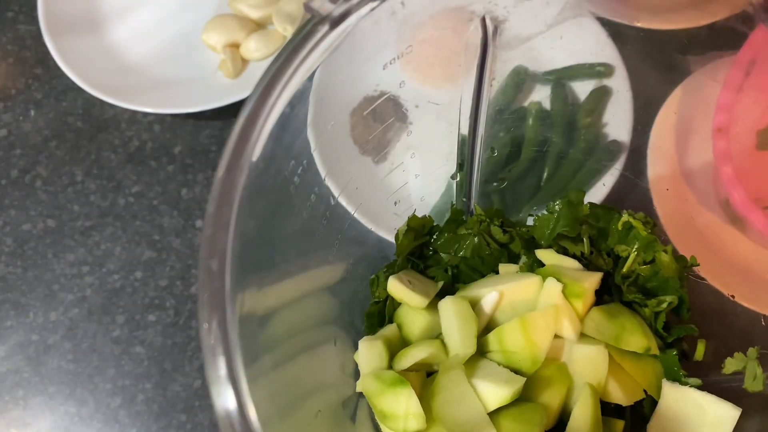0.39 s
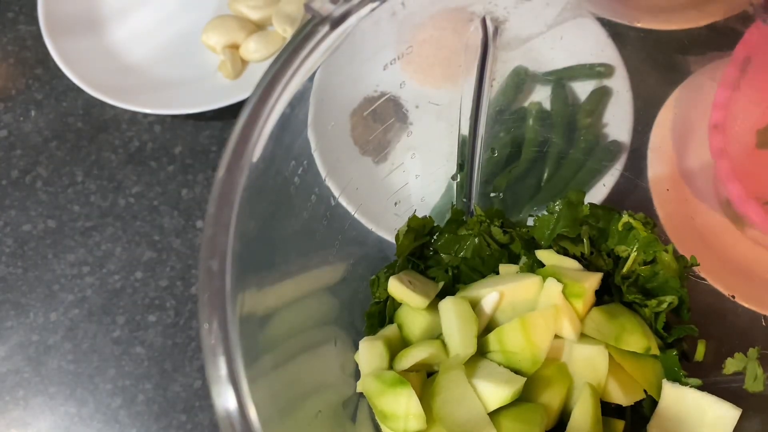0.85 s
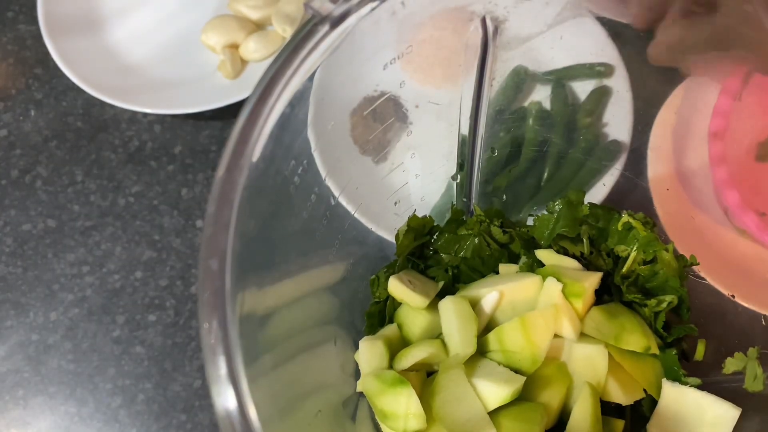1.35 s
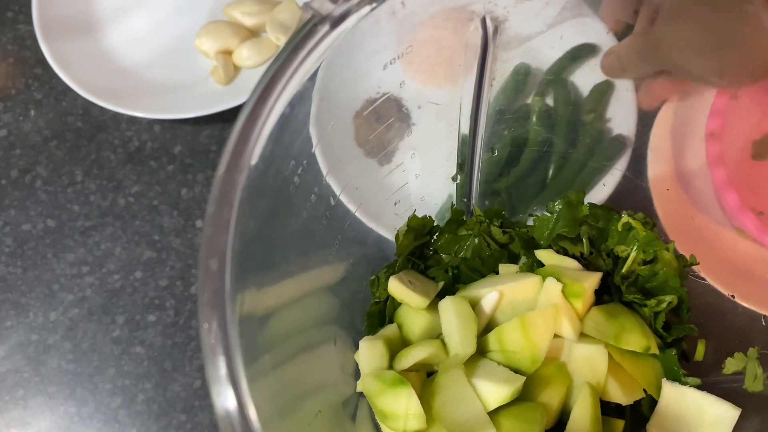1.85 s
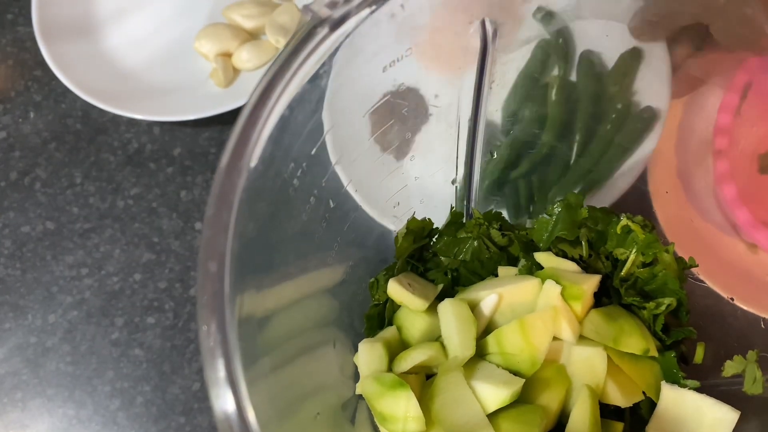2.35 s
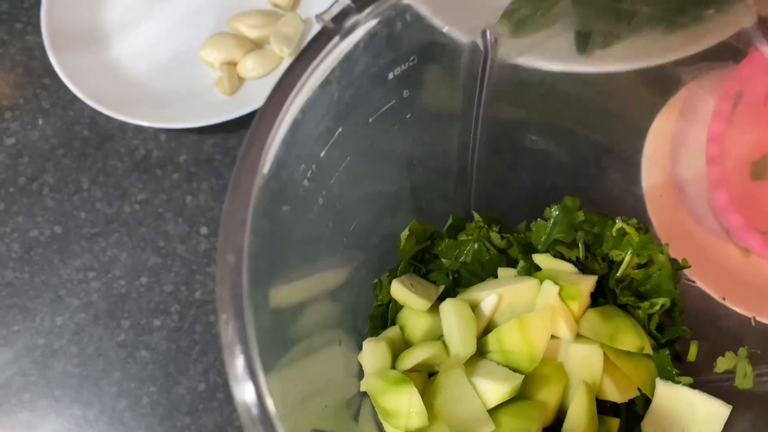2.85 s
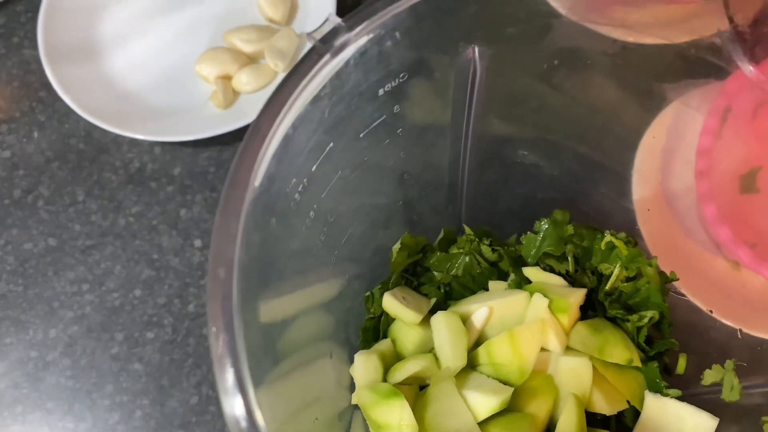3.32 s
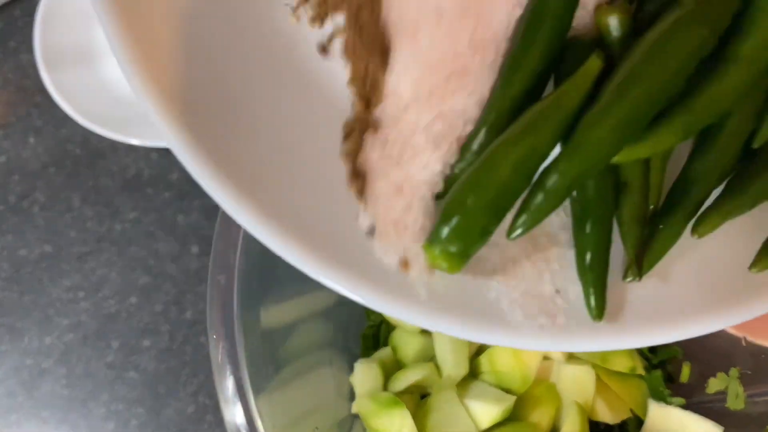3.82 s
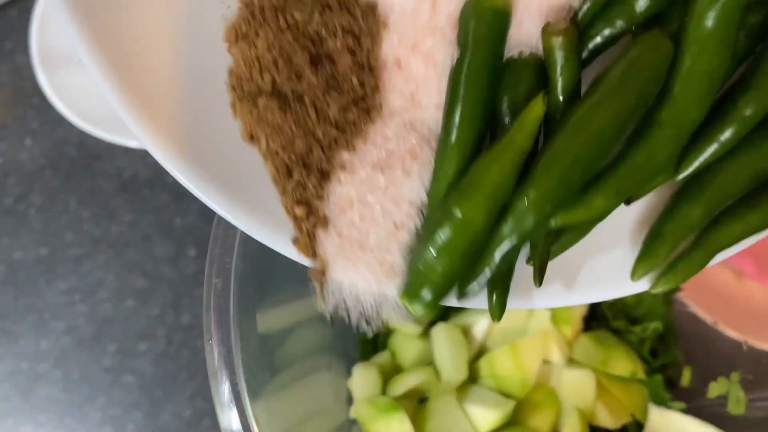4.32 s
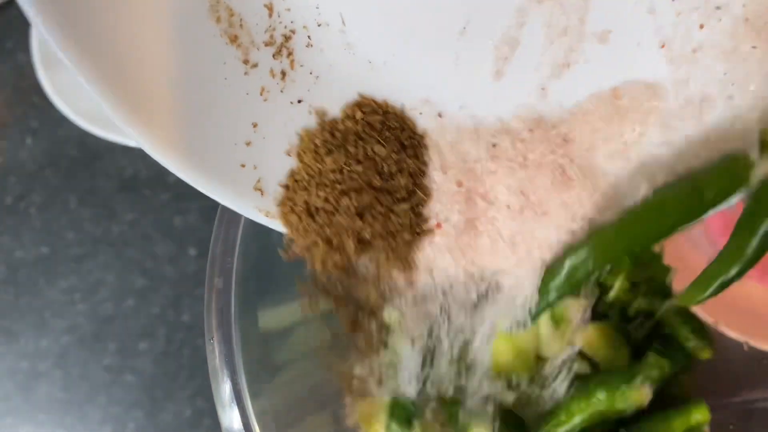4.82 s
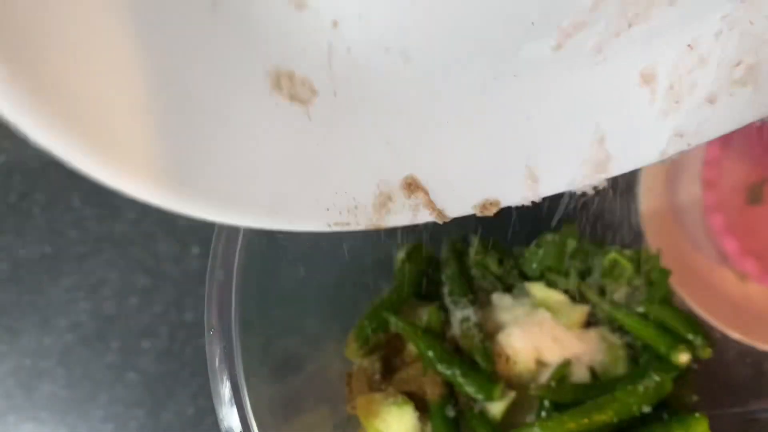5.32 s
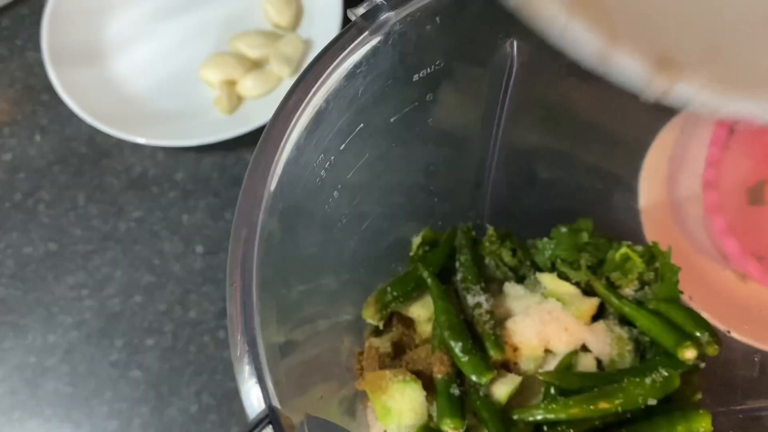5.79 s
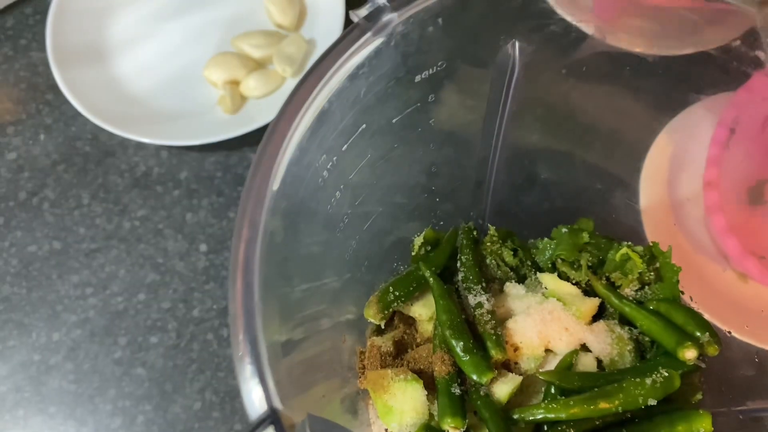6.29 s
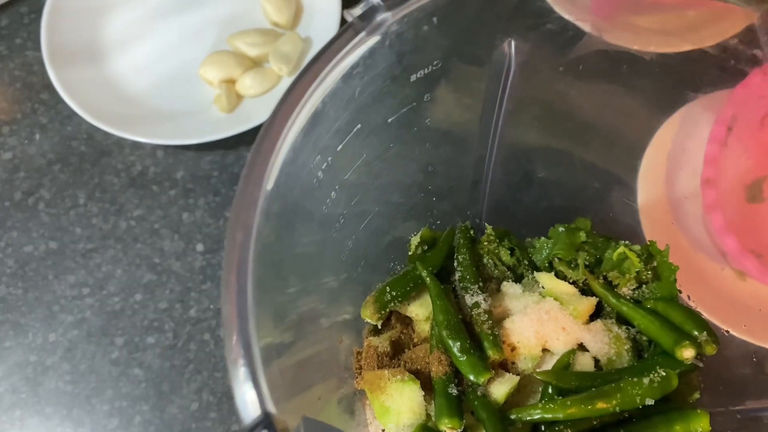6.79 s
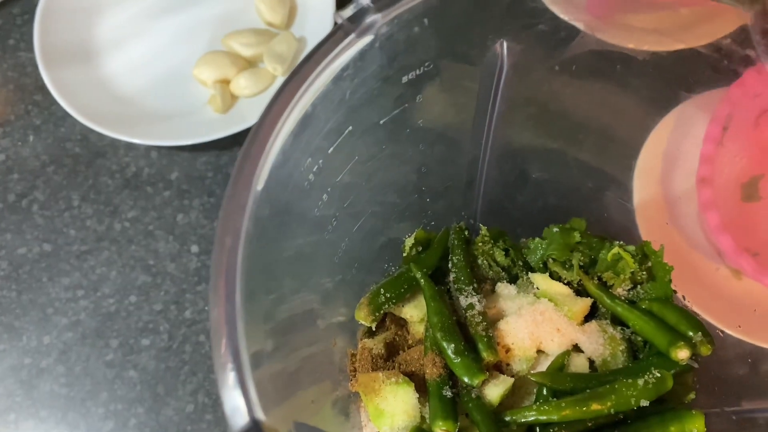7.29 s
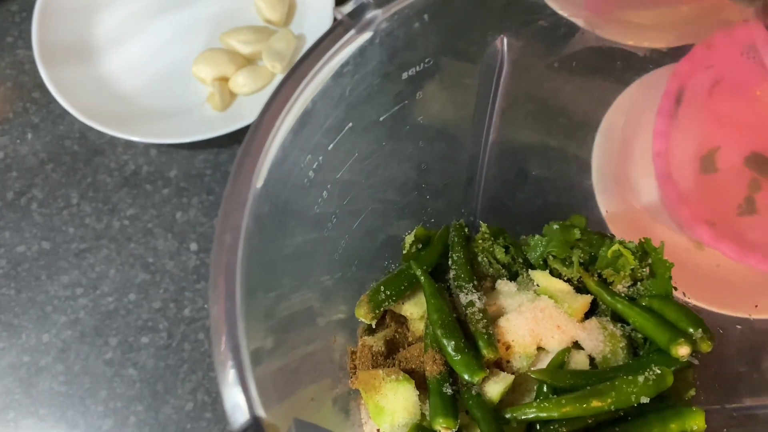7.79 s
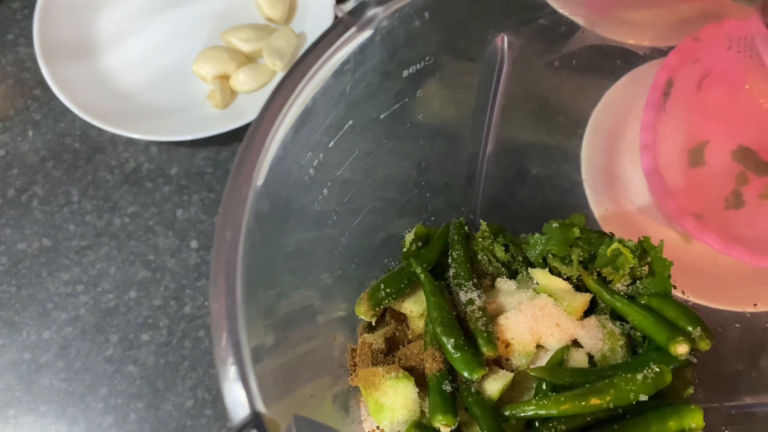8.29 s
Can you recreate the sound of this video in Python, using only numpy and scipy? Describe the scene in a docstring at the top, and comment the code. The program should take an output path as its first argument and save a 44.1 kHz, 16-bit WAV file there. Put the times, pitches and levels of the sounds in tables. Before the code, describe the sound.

Kitchen crockery is shifted on stone, grainy spice and chillies pour off a plate, the plate bangs a jar rim and rattles, then bowls clink.

```python
"""In a small kitchen, fingers rustle and plates, bowls and cups are shifted and set down on a stone worktop.
Chillies, salt and spice then slide off a plate into a glass jar, and the plate is knocked empty on the rim
and rattles; last, more china is set down. Knocks are noise bursts over a low boom, clinks are struck ringing
modes, drags and rattle are mid-band noise, and grains are dense random clicks, coloured as a hiss.
Throughout there are faint room tone, a swelling drone (filtered noise) and short reflections."""
import sys
import numpy as np
from scipy import signal
from scipy.fft import rfft, irfft
from scipy.io import wavfile
from scipy.ndimage import uniform_filter1d

SR = 44100
rng = np.random.default_rng(int(sys.argv[2]) if len(sys.argv) > 2 else 0)


def int16_out(signal):
    """Quantize to a 16-bit WAV file."""
    q = np.round(np.clip(np.atleast_2d(signal).T, -1, 1) * 32767)
    wavfile.write(sys.argv[1], SR, q.astype(np.int16))


def voltage_ratio(level):
    """Linear amplitude factor for a level in decibels (scalar or array-like)."""
    return 10 ** (np.asarray(level, float) / 20)


N = 381024


def rms_one(x):
    """Scale to unit rms."""
    return x / np.sqrt(np.mean(x ** 2) + 1e-20)


def coloured(x, points):
    """Shape the spectrum by (frequency [Hz], level [dB]) points joined on a log-frequency axis."""
    hz, db = np.transpose(points)
    bins_hz = np.fft.rfftfreq(N, 1 / SR)
    gain = voltage_ratio(np.interp(np.log(bins_hz + 1e-9), np.log(hz), db))
    return irfft(rfft(x) * gain, N)


def band(x, low_hz, high_hz, order=3):
    """Band-pass that keeps the rms of white noise."""
    high_hz = min(high_hz, SR / 2.2)
    sos = signal.butter(order, [low_hz, high_hz], "band", fs=SR, output="sos")
    return signal.sosfilt(sos, x + 1e-18) * np.sqrt(SR / 2 / (high_hz - low_hz))


def resonances(x, modes):
    """Parallel two-pole resonances with alternating signs."""
    out = 0
    for k, (hz, width_hz, db) in enumerate(modes):
        r = np.exp(-np.pi * width_hz / SR)
        poles = [1, -2 * r * np.cos(2 * np.pi * hz / SR), r * r]
        peak_gain = (-1) ** k * voltage_ratio(db) * (1 - r * r) / 2
        out = out + peak_gain * signal.lfilter([1, 0, -1], poles, x + 1e-18)
    return out


def ring(clicks, hz, t60_s):
    """A unit click sets a sine of height 1 ringing, which decays by 60 dB in t60_s."""
    r = voltage_ratio(-60 / (t60_s * SR))
    turn = 2 * np.pi * hz / SR
    return signal.lfilter([0, np.sin(turn)], [1, -2 * r * np.cos(turn), r * r], clicks + 1e-18)


def bursts(times_s, levels_db, t60_s, rise_s):
    """Envelope of short contacts: quick rise, exponential fall, cut off 60 dB down."""
    out = np.zeros(N)
    for s, db in zip(times_s, levels_db):
        at = round(s * SR)
        t = np.arange(min(int(t60_s * SR), N - at)) / SR
        out[at:at + len(t)] += voltage_ratio(db) * voltage_ratio(-60 * t / t60_s) * np.minimum(t / rise_s, 1)
    return out


def spells(rows):
    """Gain that swells to each peak and fades, by 20 dB per swell or fade time, evenly in dB."""
    t = np.arange(N) / SR
    out = 0
    for s, db, swell_s, fade_s in rows:
        distance = np.where(t < s, (s - t) / swell_s, (t - s) / fade_s)
        out = out + voltage_ratio(db - 20 * distance)
    return out


def grains(per_s, spread_db):
    """Random clicks of uneven size, as grains make, with unit mean power."""
    loudness_db = spread_db * np.minimum(rng.exponential(1, N), 4)
    sizes = rms_one(voltage_ratio(loudness_db) * rng.choice([-1, 1], N))
    share = per_s / SR
    return sizes * (rng.random(N) < share) / np.sqrt(share)


def room_tone():
    """Steady noise of the room and the microphone, strongest in the bass."""
    # noise spectrum: (frequency [Hz], relative level [dB])
    tone_colour = [(15, -15.5), (25, -3.5), (114, -11.5), (373, -23), (1290, -26.5), (16000, -36.5)]
    return voltage_ratio(-67) * rms_one(coloured(rng.standard_normal(N), tone_colour))


def drone():
    """Noise through a broad low resonance, which swells and fades."""
    # resonance: (frequency [Hz], width [Hz], level [dB], evened out by rms_one)
    drone_mode = [(376, 150, 2.5)]
    # swells: (time of the peak [s], level [dB], swell [s], fade [s])
    swells = [(1.6, -62.5, 3.0, 1.53), (4.2, -67.5, 0.62, 0.23), (4.8, -63, 0.7, 1.3),
              (6.5, -66, 0.22, 1.1), (7.6, -65.5, 1.86, 1.14)]
    return spells(swells) * rms_one(resonances(rng.standard_normal(N), drone_mode))


def kitchen(x):
    """Dense, evenly coloured reflections: octaves of noise that share one decay."""
    t = np.arange(SR // 2) / SR
    t60_s, rise_s = 0.25, 0.0057
    fade = voltage_ratio(-60 * t / t60_s) * np.minimum(t / rise_s, 1)
    tail = 0
    for hz in 200 * 2. ** np.arange(7):
        tail = tail + band(rng.standard_normal(len(t)), hz, 2 * hz) * np.sqrt(hz) * fade
    # narrow peaks stay, broad humps in the spectrum are evened out
    spectrum = rfft(tail)
    power = np.abs(spectrum) ** 2
    evening = np.sqrt(uniform_filter1d(power, size=400) / uniform_filter1d(power, size=40))
    tail = irfft(spectrum * evening)[:SR // 3]
    return signal.fftconvolve(x, tail / np.sqrt(np.sum(tail ** 2)))[:N]


def squeaks():
    """China sings while it is slid, and a thin tone sinks in the drone: gliding sines made unsteady by noise."""
    # glides: (start [s], end [s], from [Hz], to [Hz], level [dB], width [Hz])
    glides = [(0.687, 0.875, 1566, 1590, -65, 60), (7.5, 7.728, 1620, 1500, -54, 35),
              (4.03, 4.29, 808, 768, -71, 8), (6.4, 6.92, 780, 705, -73, 14)]
    edge_s = 0.048
    t = np.arange(N) / SR
    out = 0
    for start, end, from_hz, to_hz, db, width_hz in glides:
        gate = np.clip(np.minimum(t - start, end - t) / edge_s, 0, 1)
        pitch_hz = np.interp(t, [start, end], [from_hz, to_hz])
        tone = np.sin(2 * np.pi * np.cumsum(pitch_hz) / SR)
        r = np.exp(-np.pi * width_hz / SR)
        wander = rms_one(signal.lfilter([1], [1, -2 * r, r * r], rng.standard_normal(N)))
        out = out + voltage_ratio(db) * gate * tone * wander
    return out


def rustle():
    """Uneven grains crackle under the fingers, more even ones hiss as they pour or slide; ticks stand out."""
    # dry ticks of crumbs and grains: (time [s], level [dB])
    crumbs = [(0.197, -34.5), (1.449, -37.5), (4.044, -46.5), (4.3895, -42), (4.427, -24), (4.506, -29.5),
              (4.762, -31), (5.0832, -39.5), (6.1756, -36), (6.7059, -37.5), (6.857, -50), (7.359, -28.5),
              (7.785, -47), (5.028, -44.5), (8.035, -47.5), (8.061, -43), (8.298, -35), (8.571, -41)]
    # salt and spice pouring off the plate, a level curve: (time [s], level [dB])
    pour = [(4.15, -82.5), (4.37, -66), (4.41, -52.5), (4.55, -52.5), (4.72, -56.5), (4.8, -48), (5.1, -60),
            (5.7, -63.5), (5.92, -87.5)]
    # spells of sliding and of finger rustle: (time of the peak [s], level [dB], swell [s], fade [s])
    slides = [(2.6, -75, 0.069, 0.073), (3.62, -78, 0.19, 1), (6.72, -63, 0.37, 0.25),
              (8.55, -72, .4, 0.64)]
    finger_rustles = [(.11, -61, 0.1, 0.11), (.195, -59, 0.26, 0.01), (1.29, -63, 0.049, 0.047),
                      (2.1, -68.5, 0.25, 0.45), (6.0, -61.5, 0.17, 0.44), (7.36, -42.5, 0.013, 0.0088),
                      (8.07, -63, .12, .05), (8.28, -57.5, .12, 0.11)]
    # spectrum of the grains: (frequency [Hz], relative level [dB])
    grain_colour = [(1200, -28.5), (2800, -7), (7000, -11.5), (13500, -1), (16500, -1.5)]
    tick_s, tick_db = np.transpose(crumbs)
    ticks = bursts(tick_s, tick_db - 6.5, t60_s=0.023, rise_s=0.001) * rng.standard_normal(N)
    pour_s, pour_db = np.transpose(pour)
    pouring = voltage_ratio(np.interp(np.arange(N) / SR, pour_s, pour_db))
    hiss = (pouring + spells(slides)) * grains(per_s=11000, spread_db=4.5)
    crackle = spells(finger_rustles) * grains(per_s=9500, spread_db=8.5)
    return voltage_ratio(5.0) * coloured(crackle + hiss + ticks, grain_colour)


def drags_and_rattle():
    """China dragged on stone and a plate rattling: mid-band noise of dense, nearly even clicks."""
    # drags, and a plate rattle at 6.045 s: (time of the peak [s], level [dB], swell [s], fade [s])
    scrapes = [(.72, -77.5, 0.35, 0.69), (6.045, -39, 0.01, 0.069), (7.06, -87.5, 0.022, 5.2),
               (7.6, -65, 0.68, 0.28)]
    return spells(scrapes) * band(grains(per_s=4000, spread_db=1.5), 500, 2000)


def knocks():
    """Each contact is a noise chatter over a soft push that booms; hard ones have edge and sparkle."""
    # knocks of china on stone and glass: (time [s], level [dB], thump above that level [dB],
    # hardness as edge above that level [dB])
    contacts = [(0.314, -31, -16.5, -26.5), (0.412, -17, -17.5, -18.5), (0.439, -23.5, -25, -17.5),
                (0.631, -40.5, -20, -31), (0.644, -23, -21, -38), (0.805, -45, -9.5, -1),
                (0.855, -41, -22, -8), (0.89, -29.5, -21, -12.5), (0.899, -32.5, -27, -22),
                (0.93, -33.5, -23, -22), (1.303, -30.5, -9.5, -11.5), (1.323, -24, -16, -13.5),
                (1.533, -47.5, -15, -5), (1.581, -50, 4, -6), (1.666, -39, -18, -3), (1.751, -58.5, 6, -14),
                (1.831, -38, -16, -1.5), (1.906, -36.5, -45, -5), (2.03, -48, -14, -11),
                (2.089, -49, -26, -26), (2.112, -39.5, -21.5, -35), (2.29, -33, -16, -7),
                (4.5, -35.5, -24, -18), (4.639, -43, -23, -5.5), (4.863, -52, -25, 3),
                (5.149, -22, -23.5, 0), (5.164, -14.5, -20.5, -4.5), (5.349, -10, -24, -0.5),
                (5.518, -25, -8.5, 3), (5.529, -13.5, -15.5, 0.5), (6.016, -15.5, -16.5, 0),
                (6.045, -22, -23.5, -1.5), (6.066, -28.5, -16, 2.5), (6.094, -30, -25, 3),
                (7.03, -28.5, -16, -17), (7.117, -22.5, -16, -10.5), (7.422, -27.5, -10.5, -7),
                (7.473, -27.5, -20.5, 7.5), (7.75, -43.5, -6.5, -9), (7.81, -28, -27, -18),
                (7.853, -36, -24, 1.5), (8.294, -58.5, 4, -18), (8.619, -42, -38.5, -7.5)]
    # chillies tumbling keep the worktop booming: (time of the peak [s], level [dB], swell [s], fade [s])
    tumbling = [(4.62, -76, 0.266, 0.93)]
    s, level_db, thump_db, hardness_db = np.transpose(contacts)
    body_db = level_db - 6.0
    edge_db = body_db + hardness_db
    # soft contacts lose the top octaves a little faster than the edge
    sparkle_db = edge_db - 3 + 0.16 * np.minimum(hardness_db, 0)
    body = bursts(s, body_db, t60_s=0.062, rise_s=0.0026) * rng.standard_normal(N)
    edge = bursts(s, edge_db, t60_s=0.062, rise_s=0.0026) * rng.standard_normal(N)
    sparkle = bursts(s, sparkle_db, t60_s=0.037, rise_s=0.00079) * rng.standard_normal(N)
    push = bursts(s, level_db + thump_db - 14, t60_s=0.0086, rise_s=0.0017)
    push = push + spells(tumbling) * grains(per_s=430, spread_db=4.5)
    boom = voltage_ratio(-12) * band(push, 90, 350, order=2) + voltage_ratio(-14.5) * ring(push, hz=158, t60_s=0.22)
    chatter = band(body, 310, 1350) + band(edge, 1350, 3900) + band(sparkle, 3900, 16000, order=2)
    return boom + chatter


def worktop(contact):
    """The stone passes the contact on and adds its own low resonances."""
    # resonances: (frequency [Hz], width [Hz], level [dB])
    stone_modes = [(202.8, 32, 13.5), (274, 14, 7.5), (444.6, 27, 2), (538, 33, 10), (666, 140, -6)]
    return voltage_ratio(3) * contact + voltage_ratio(1.5) * resonances(contact, stone_modes)


def china(hits, modes, gain_db, rubbing=0):
    """Clinks strike modes, each split in three by the uneven rim; rubbing keeps them singing."""
    s, db, hardness = np.transpose(hits)
    out = np.zeros(N)
    for hz, mode_db, t60_s in modes:
        strength_db = db + gain_db + hardness * np.log2(hz / 3000)
        for split in (1 - 0.012, 1, 1 + 0.006):
            # every part starts up to 3 ms late and up to 5 dB louder or softer
            delay_s = 0.003 * rng.random(len(s))
            luck_db = 10 * (rng.random(len(s)) - 0.5)
            clicks = np.zeros(N)
            clicks[((s + delay_s) * SR).astype(int)] = voltage_ratio(strength_db + luck_db)
            out += voltage_ratio(mode_db) * ring(rubbing + clicks, hz * split, np.clip(t60_s, 0.02, 0.5))
    return band(out, 300, 20000, order=2)


def clinks(scrape):
    """China and glass ring when struck; drags, rattle, loose grains and a finger excite plate and bowl."""
    # clinks on each piece, before chance shifts: (time [s], level [dB], hardness about 3 kHz [dB per octave])
    plate_hits, bowl_hits = [(6.017, -13, -7), (6.047, -24, 5), (6.072, -22.5, 2.5), (6.930, -68, 18),
                             (7.118, -33, -4)], [(1.305, -43, -4), (1.325, -26.5, -5.5),
                                                 (7.032, -38.5, -9.5), (7.119, -32, -11.5),
                                                 (8.617, -40, -11), (7.423, -11.5, -7.5),
                                                 (7.470, -12.5, -2), (7.856, -28.5, 1)]
    saucer_hits, cup_hits, jar_hits = [(1.667, -23.5, 1.5), (1.908, -21, 0.5), (1.916, -34, -7)], [(.894, -35.5, 2), (.935, -47.5, 3),
                                                            (7.812, -43, -2)], [(4.499, -26, 0.1),
                                                                              (4.597, -31.5, 7),
                                                                              (4.637, -23, 6.3),
                                                                              (4.704, -26, 10.7),
                                                                              (4.862, -38, 2),
                                                                              (4.944, -32.5, 10),
                                                                              (5.027, -41.5, 7.8)]
    # the plate knocked on the rim of the jar, same columns
    rim_hits = [(5.165, -19, 0), (5.351, -14, -2.5), (5.531, -16.5, -3.5), (6.018, -20, -1)]
    # what each piece rings with: (frequency [Hz], level [dB], t60 [s], 0.02 at least)
    plate_modes, bowl_modes = [(885, -13, 0.087), (1142, 0.5, 0.08), (1468, -6, 0.14), (1820, -9.5, 0.08),
                               (2046, -9, 0.15), (3620, -12.5, 0.13), (4200, -15.5, 0.084),
                               (5670, -16, 0.12), (8060, -18.5, 0.064), (9700, -23, 0.17),
                               (11740, -15, 0.087), (14100, -14.5, .07)], [(1333, -17, 0.081), (1603, -12, 0.037), (2044, -4.5, 0.076),
                                              (2805, -12, 0.051), (3680, -14, 0.12), (5130, -20, 0.1),
                                              (6180, -15.5, 0.041), (6524, -19, 0.08), (7460, -19, 0.13),
                                              (8130, -8.5, 0.04), (9980, -12, 0.058), (10680, -8.5, 0.034),
                                              (12900, -7, 0.055), (14550, -19.5, 0.06)]
    saucer_modes, cup_modes, jar_modes = [(2103, 4, 0.049), (2920, -12, 0.05), (3990, -10, 0.049),
                                          (5270, -10.5, 0.054), (6770, -10.5, 0.045), (8150, -11, 0.033),
                                          (9640, -18, 0.06), (12000, -15, 0.053), (14200, -20, 0.064)], [(1706, 9.5, 0.13), (3540, -3, 0.14),
                                                          (5640, -11, 0.059), (7780, -15, 0.085),
                                                          (10400, -19, .06), (13070, -16, 0.07)], [(879, -13.5, 0.19),
                                                                       (1150, -14.5, 0.079),
                                                                       (1483, -8, 0.042),
                                                                       (2010, -15, 0.018),
                                                                       (2590, -12.5, 0.021),
                                                                       (3270, -18.5, 0.02)]
    # what plate and jar ring with together, same columns
    rim_modes = [(458.4, -2.5, 0.086), (663, 0, 0.023), (1680, -3, 0.023), (2500, -7.5, 0.03)]
    # loose grains on the plate, a finger along the bowl: (time of the peak [s], level [dB], swell [s], fade [s])
    loose_grains = [(3.58, -92, 0.14, 0.41), (4.45, -88.5, 0.3, 0.53), (7.25, -93.5, 0.5, 0.494)]
    bowl_rubs = [(7.7, -92, 0.41, 0.18)]
    loose = spells(loose_grains) * band(grains(per_s=1400, spread_db=4.0), 8600, 14000, order=1)
    finger = spells(bowl_rubs) * band(rng.standard_normal(N), 3000, 12000)
    plate_rub = loose + voltage_ratio(-39.0) * scrape
    bowl_rub = voltage_ratio(-40) * band(scrape, 1200, 1890) + finger
    out = china(plate_hits, plate_modes, -16.5, plate_rub)
    out += china(bowl_hits, bowl_modes, -8.0, bowl_rub)
    out += china(saucer_hits, saucer_modes, -20.0)
    out += china(cup_hits, cup_modes, -11.0)
    out += china(jar_hits, jar_modes, -6.5)
    out += china(rim_hits, rim_modes, -8.0)
    return out


def scene():
    """Knocks, drags and rattle sound through the worktop; near sounds and grit fill the kitchen."""
    scrape = drags_and_rattle()
    near = worktop(knocks() + scrape) + clinks(scrape) + squeaks()
    grit = rustle()
    reflections = voltage_ratio(-6) * kitchen(near + voltage_ratio(-8.5) * grit)
    mix = near + grit + reflections + drone() + room_tone()
    return mix[None]


def low_pass(x):
    """Removes everything above the highest recorded frequency."""
    return signal.sosfilt(signal.butter(12, 16810, fs=SR, output="sos"), x)


def record(dry):
    """A steep low-pass cuts the top of the finished mix."""
    top_cut = signal.cheby2(10, 30, 16300, fs=SR, output="sos")
    finished = signal.sosfilt(top_cut, dry)
    return low_pass(finished)


dry = scene()
out = record(dry)
int16_out(out)
```